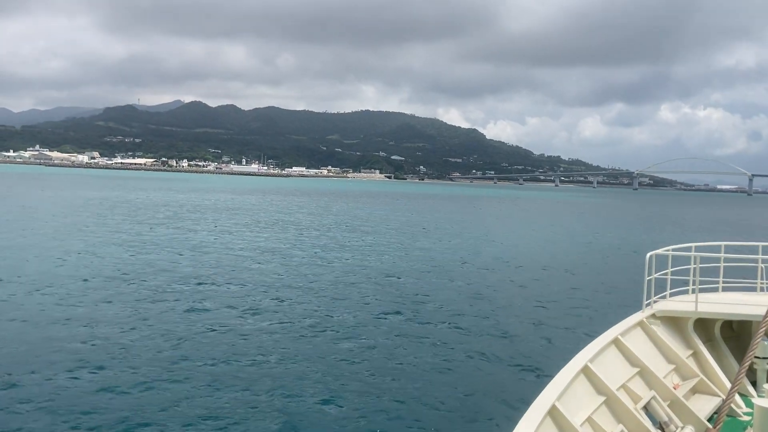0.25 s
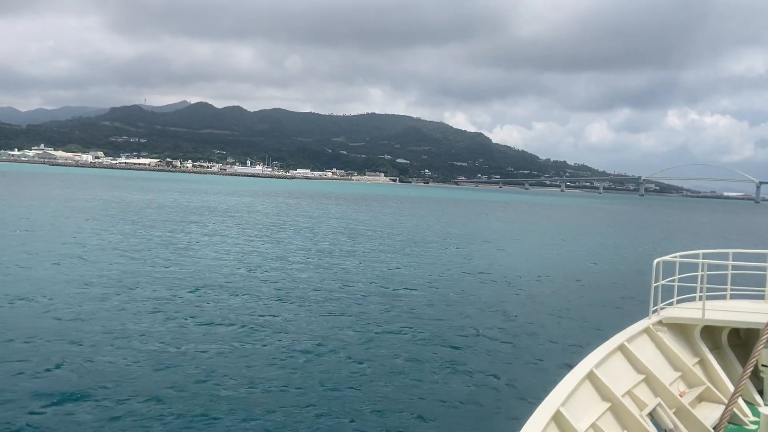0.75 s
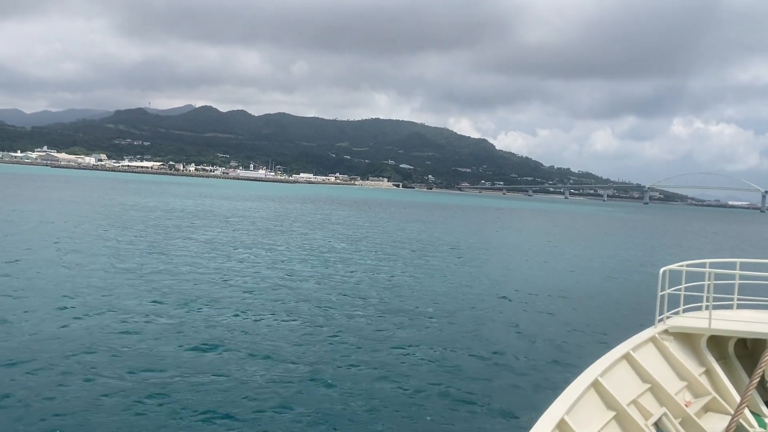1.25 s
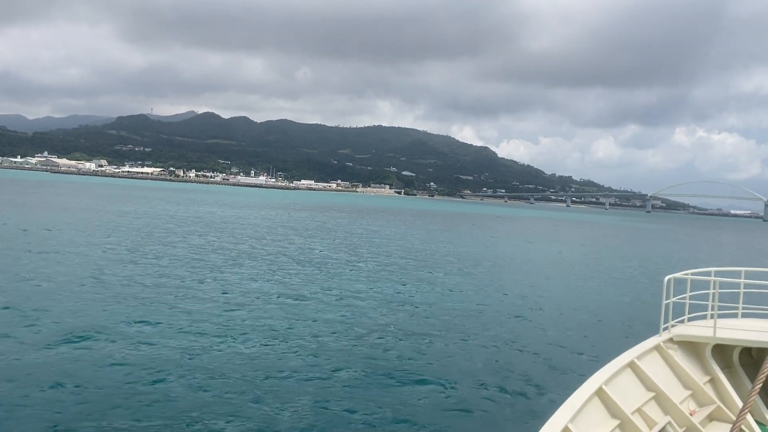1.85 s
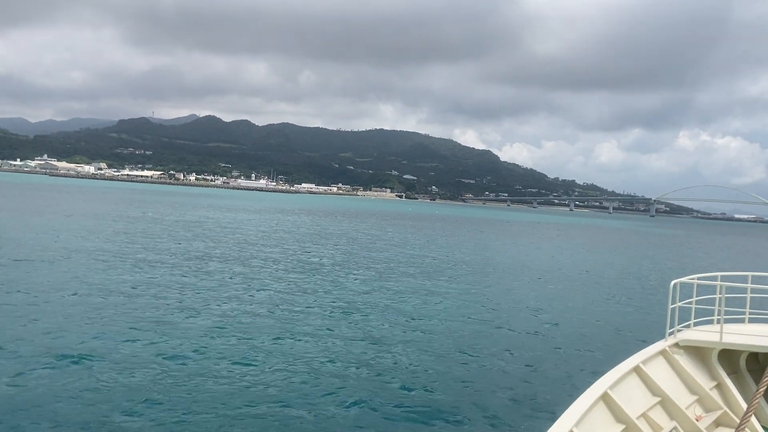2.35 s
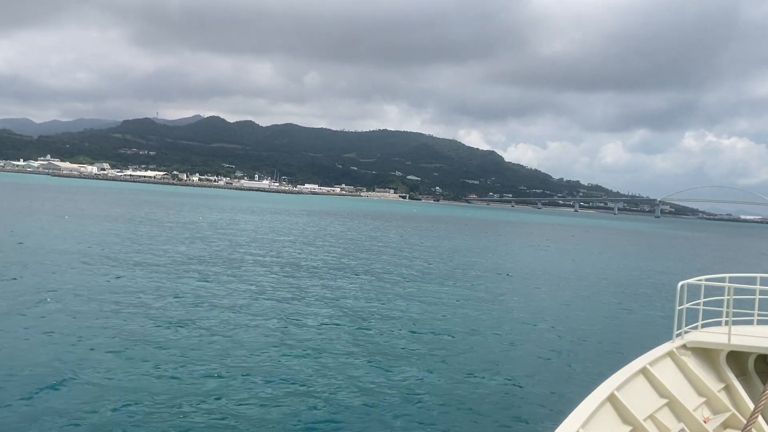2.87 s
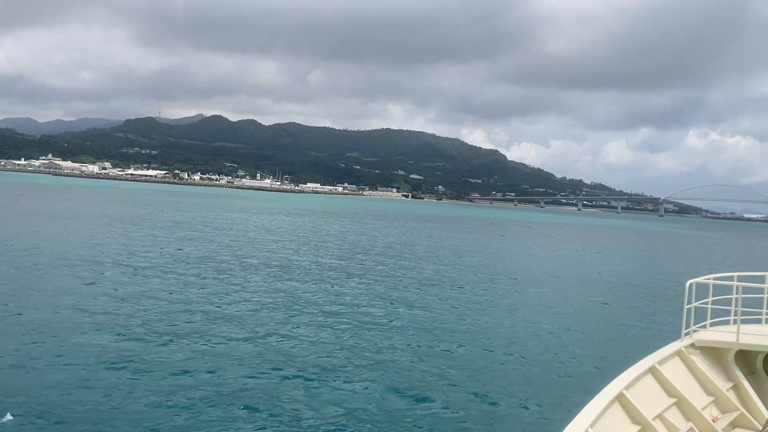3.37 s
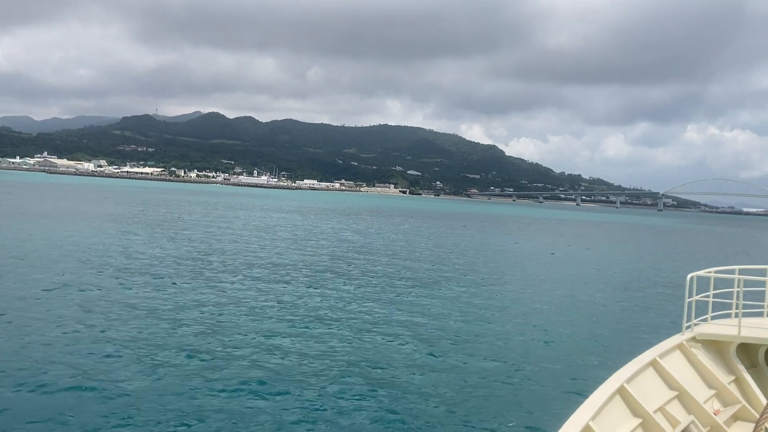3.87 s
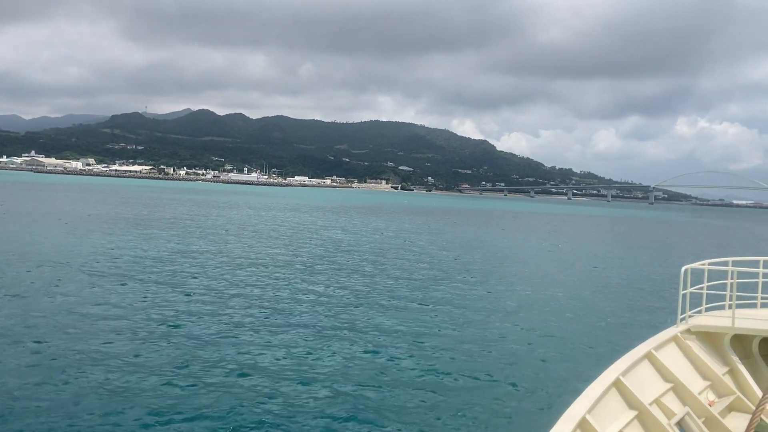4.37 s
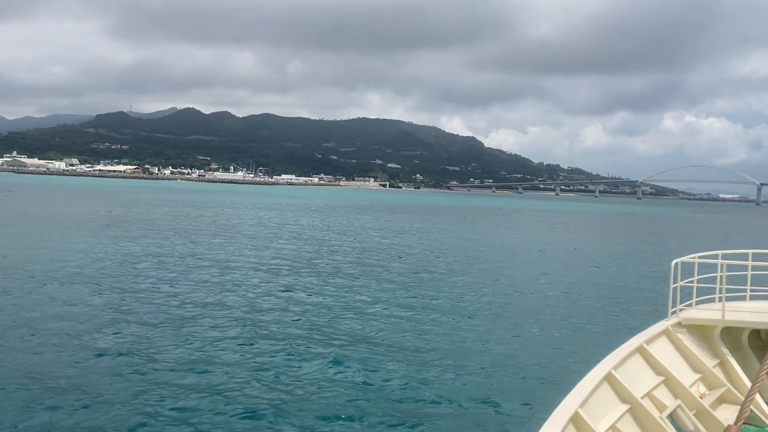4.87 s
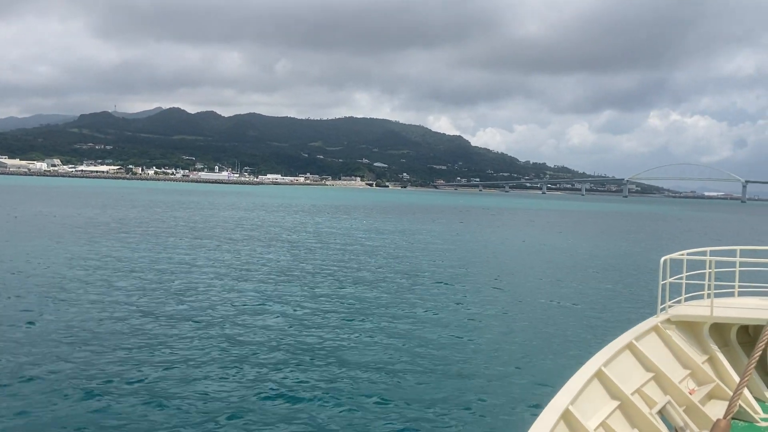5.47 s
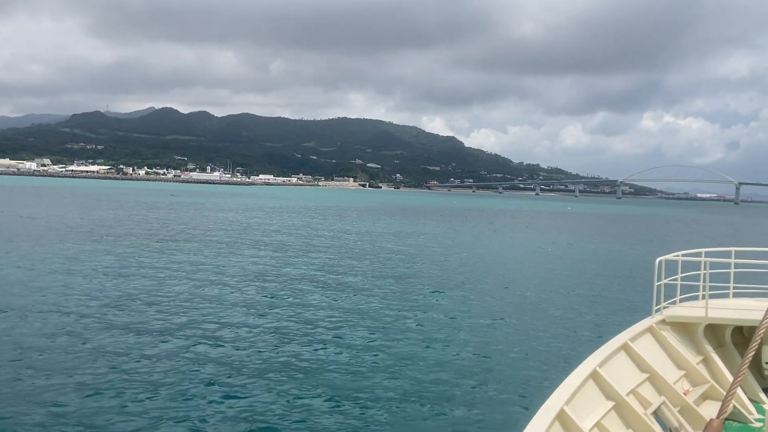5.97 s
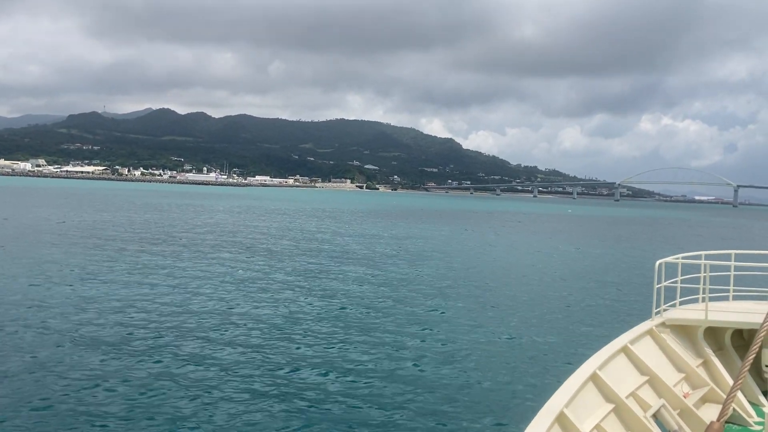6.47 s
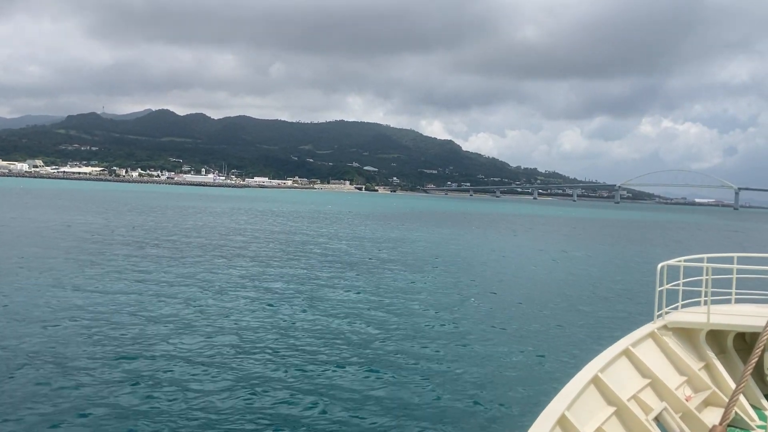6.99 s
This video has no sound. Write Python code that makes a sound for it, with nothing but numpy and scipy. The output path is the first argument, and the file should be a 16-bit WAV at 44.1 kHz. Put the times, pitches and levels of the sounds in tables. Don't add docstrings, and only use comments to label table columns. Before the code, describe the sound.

On a ship's open deck at sea, wind overwhelms an exposed stereo phone microphone: low flapping rumble, abrupt thumps and small crackling slaps, broken by short lulls. Behind it runs a soft, steady rush of bow wash and spray with a dull engine hum. Buffeting comes first, then a calmer second, then a hard gust and repeated scattered blows until the end.

```python
import sys
import numpy as np
from scipy import signal
from scipy.fft import rfft, irfft, next_fast_len
from scipy.io import wavfile
from scipy.ndimage import uniform_filter1d

SR = 44100
rng = np.random.default_rng(int(sys.argv[2]) if len(sys.argv) > 2 else 0)


def natural_amplitude(level_db):
    exponent = np.asarray(level_db, float) / 20
    return 10 ** exponent


def wrap_up_sound(samples):
    columns = np.atleast_2d(samples).T
    tamed = np.clip(columns, -1, 1)
    steps = np.round(tamed * 32767).astype(np.int16)
    wavfile.write(sys.argv[1], SR, steps)


N = 318843

TIME_S = np.arange(N) / SR
CLOCK_S = TIME_S[::32]
TICK_OF_CLOCK_S = CLOCK_S[1]
SIZE = next_fast_len(N)
OCTAVE = np.log2(np.linspace(1, SR / 2, SIZE // 2 + 1))

HULL_HZ, HULL_DB = 46.5, -36

# time in seconds, spray level in dB.
SPRAY_LEVELS = [(0.0, -50), (0.18, -53.5), (0.76, -51.5), (1.37, -57), (1.89, -50.5), (2.03, -53.5),
                (2.46, -49), (2.56, -52.5), (3.12, -55.5), (3.36, -50.5), (4.87, -51.5), (5.01, -47.5),
                (5.15, -53), (5.36, -47.5), (5.66, -48), (5.86, -53), (6.56, -45.5), (7.23, -47)]
# frequency in Hz, level in dB per band.
WASH_COLOUR = [(500, 12), (1000, -0.5), (2000, 1), (3000, 2.5), (4500, -1.5), (6000, -8.5), (8000, -7)]
# frequency in Hz, level in dB per band.
SPRAY_COLOUR = [(5000, -11), (7000, -12), (9000, -7), (11000, -1), (13000, -4), (15500, -5)]
WASH_DB, WASH_DB_PER_SPRAY_DB, USUAL_SPRAY_DB = -52.5, 0.6, -51.5

# time in seconds, peak in dB, treble in dB.
SLAPS = [(0.0054, -29.5, -12), (0.0727, -35, -18), (0.495, -38.5, -9), (1.1657, -37.5, -12),
         (2.602, -30, -19), (2.6479, -31, -17), (2.7701, -40, -14), (2.8179, -34, -8), (2.833, -25, -13.5),
         (2.8494, -28.5, -15.5), (2.8674, -28, -13), (2.93, -32, -16), (3.2311, -34, -12),
         (3.5164, -32, -20), (3.7803, -41, -13), (3.8202, -36, -16), (4.309, -29, -17), (4.9367, -35, -13),
         (4.9741, -32, -15), (5.1836, -26.5, -23), (5.2579, -41, -16), (5.2819, -27, -19),
         (5.3832, -32, -16), (5.696, -24, -21), (5.8553, -31.5, -18), (5.9319, -36, -16),
         (6.2045, -27, -14), (6.2386, -26.5, -17), (6.6813, -30, -14), (6.8234, -21.5, -18.5)]
TICKS_PER_S, TICK_DB, TICK_SPREAD_DB = 45, -53, 2.2
CRACK_S, CRACK_DB = 2.836, -38

# time in seconds, peak in dB, bass in dB, length in seconds.
PUFF_EVENTS = [(0.151, -5.5, -10, 0.022), (0.273, -5.5, -21, 0.02), (0.595, -9.5, -18, 0.013),
               (0.731, -19, -22, 0.025), (2.59, -7, -2, 0.017), (2.648, -5.5, -18, 0.021),
               (2.784, -14, -12, 0.027), (2.833, -5, -4.5, 0.025), (2.867, -1, -9, 0.023),
               (2.929, -7.5, -7, 0.014), (3.515, -13.5, -3, 0.019), (3.631, -23, -9, 0.018),
               (3.773, -10, -7, 0.017), (3.812, -10, -5.5, 0.022), (3.923, -8, -5, 0.024),
               (3.961, -4, -9.5, 0.022), (4.125, -14, -1, 0.018), (4.157, -18, -12, 0.024),
               (4.264, -26, -11, 0.024), (4.363, -6, -2.5, 0.033), (4.934, -1, -8, 0.019),
               (5.136, -4.5, -8, 0.022), (5.192, -2, -23, 0.017), (5.424, -6.5, -6, 0.024),
               (5.692, -4.5, -20, 0.013), (5.861, -9, -25, 0.016), (6.193, -11.5, 2, 0.014),
               (6.223, -14, -8, 0.029), (6.716, -10.5, -9, 0.02), (6.821, -2.5, -6, 0.016)]

EDDY_PITCH_HZ = (70, 220, 600, 1250)
# frequency in Hz, level in dB per band.
WIND_COLOUR = [(28, -38), (40, -20), (56, -5.5), (110, -3), (220, -5), (450, -6), (800, -4.5), (1250, -3),
               (1800, -14.5), (2600, -23.5), (4000, -32.5), (5200, -45)]
# time in seconds, strength in dB, brightness in dB.
BREEZE_LEVELS = [(0.0, -13.5, -14), (0.32, -32, 6.5), (0.82, -24, 1), (1.09, -31.5, 8), (1.47, -28.5, 4),
                 (1.79, -32.5, 1.5), (2.6, -34.5, 3.5), (2.78, -26.5, 8), (2.98, -22, -2), (3.4, -31, 3.5),
                 (4.45, -22, -4), (4.79, -23.5, -2), (5.3, -22.5, 4.5), (5.46, -23, -2), (6.56, -31.5, 3),
                 (7.23, -27.5, 2.5)]
# level in the usual breeze in dB, dB per dB of strength, dB per dB of brightness.
EDDIES_IN_BREEZE = [
    (-25.5, -0.34, 0),
    (-27.5, .5, -.3),
    (-30.5, 0.95, 0.1),
    (-40, 1.82, 1.01),
]
USUAL_BREEZE_DB = -29
# start in seconds, length in seconds, strength in dB, weight in dB.
BUFFET_EVENTS = [(0.0, 0.17, -30, 7.5), (0.247, .1, -24, 1.5), (0.435, .12, -23.5, -0.5),
                 (0.59, 0.2, -17, -4), (0.82, 0.028, -20.5, 0), (0.894, 0.15, -25.5, -4),
                 (1.374, 0.057, -22.5, -1), (2.586, 0.1, -19, -1), (2.691, 0.073, -16.5, -6),
                 (2.775, 0.029, -19, 4.5), (2.827, 0.074, -13, -1), (2.9, 0.037, -13, -9),
                 (2.977, 0.21, -18.5, -12), (3.211, 0.12, -19, -4), (3.602, 0.097, -19, -5),
                 (3.764, 0.051, -23, -3.5), (3.876, 0.13, -20, -9), (4.03, 0.091, -21, 0),
                 (4.111, 0.069, -20, 2), (4.23, 0.34, -17, -8), (4.58, .14, -23.5, -4),
                 (4.926, 0.13, -18, -3.5), (5.133, 0.24, -19, 0), (5.425, 0.064, -19, -9),
                 (5.666, 0.051, -15.5, -17), (5.827, 0.058, -19, -7), (6.185, 0.066, -11.5, -6),
                 (6.629, 0.19, -20, 1.5), (6.794, 0.058, -17.5, 2.5), (7.057, .07, -23.5, 4)]
# level under a buffet in dB, dB per dB of weight.
EDDIES_IN_BUFFET = [
    (-14.5, -0.7),
    (-2.5, 1.92),
    (-2, 0),
    (-12.5, 0.18),
]
ARCH_DB = (0.1, 0.5, 1.5, 4)
BUFFET_RISE_S, BUFFET_FALL_S, BUFFET_SAG_DB_PER_S = 0.0057, 0.023, -7.5
# start in seconds, length in seconds, strength in dB.
HEAVE_EVENTS = [(0.037, 0.093, -22), (0.28, 0.022, -30), (0.656, 0.026, -17), (1.856, 0.04, -14),
                (2.221, 0.029, -30), (2.6, 0.07, -20), (2.66, 0.044, -33), (2.732, 0.03, -22),
                (2.814, 0.038, -7), (2.993, 0.054, -19), (3.18, 0.067, -16), (4.313, 0.053, -17),
                (4.947, 0.05, -17), (5.21, 0.11, -25), (5.675, 0.043, -16), (6.173, 0.052, -13),
                (6.243, 0.029, -17), (6.674, 0.21, -17), (7.092, 0.03, -19)]
HEAVE_SHARE_DB = (-4, -12.5, -25, -40)
HEAVE_RISE_S, HEAVE_FALL_S = 0.022, 0.036
# middle in seconds, length in seconds, depth in dB.
LULL_EVENTS = [(0.218, 0.045, -0.5), (0.415, .06, -1.5), (0.587, 0.087, -7), (0.779, 0.046, -10),
               (.875, .03, -8), (1.775, .08, -6.5), (2.582, 0.017, 3), (2.768, 0.034, -5),
               (2.971, 0.032, -7), (3.19, .04, 1), (3.383, 0.035, -6), (3.74, .03, -2.5),
               (4.093, 0.018, -7), (4.184, 0.078, -7), (4.912, 0.025, -8), (5.112, 0.048, -5),
               (5.415, .02, -4), (5.584, 0.12, -8), (5.772, 0.068, -7.5), (6.154, 0.14, -2.5),
               (6.217, 0.011, -17), (6.592, .04, -7), (6.923, 0.11, -3.5)]
LULL_SHARE = (.2, .7, 1.01, 1.1)

# frequency in Hz, likeness from 0 to 1.
PORT_LIKENESS = [(100, 0.74), (900, 0.83), (1300, 0.15), (1600, 0.71), (2100, 0.08), (3000, 0.25),
                 (3700, 0), (4400, 0.45), (5100, 0), (5700, 0.26), (6300, 0.06), (6900, 1), (16000, 1)]
# frequency in Hz, left minus right in dB.
PORT_TILT = [(600, -.6), (1200, 5), (2000, 1.2), (4200, .8), (5400, -3.6), (7000, 0)]
# frequency in Hz, phase in turns.
BODY_TURNS = [(1900, 0), (2600, -.5), (3500, -.55), (4000, -.87), (5000, -1), (5500, -1.45), (6100, -1.4),
              (6500, -1.05), (6992, -1)]
EDDY_LAG_S, EDDY_IN_PHASE_HZ, EDDY_TOP_HZ = 1 / 430, 520, 1400
SPRAY_LEAD_S, SPRAY_IN_PHASE_HZ = 2.296e-4, 6992

# time in seconds, edge in Hz.
MONO_EDGE = [(0.0, 402), (2.4, 454), (3.6, 430), (4.4, 255), (5.0, 177), (6.1, 159), (6.8, 305),
             (7.23, 350)]
TOP_HZ = 15700


def over_hz(hz, table):
    table_hz, value = np.transpose(table)
    return np.interp(np.log(hz), np.log(table_hz), value)


def over_time(table):
    s, *columns = np.transpose(table)
    return np.array([np.interp(CLOCK_S, s, column) for column in columns])


def noise():
    return rfft(rng.standard_normal((2, SIZE)))


def walk(rate_hz):
    k = max(int(1 / rate_hz / TICK_OF_CLOCK_S), 1)
    draws = rng.standard_normal(len(CLOCK_S) // k + 1)
    held = np.repeat(draws, k)[:len(CLOCK_S)]
    slewed = uniform_filter1d(uniform_filter1d(held, k), k)
    return 1.8 * np.tanh(.9 * slewed)


def band(white, hz, octaves, gain):
    offset = np.clip((OCTAVE - np.log2(hz)) / octaves, -1, 1)
    x = irfft(white * np.cos(np.pi / 2 * offset) ** 2, SIZE)[:, :N]
    return x * np.interp(TIME_S, CLOCK_S, gain / x[:, ::7].std())


def spell(start_s, length_s, rise_s, fall_s):
    up = (CLOCK_S - start_s) / max(rise_s, .002)
    down = (start_s + length_s - CLOCK_S) / max(fall_s, .002)
    return np.sin(np.pi / 2 * np.clip(np.minimum(up + .5, down + .5), 0, 1)) ** 2


def hull():
    return band(noise(), HULL_HZ, 0.9, natural_amplitude(HULL_DB + 0.97 * walk(2.7)))


def sea():
    spray_db = over_time(SPRAY_LEVELS)[0] + 1.17
    wash_db = WASH_DB + WASH_DB_PER_SPRAY_DB * (spray_db - USUAL_SPRAY_DB)
    white, out, surge, fizz = noise(), 0, walk(22), walk(50)
    for hz in 500 * 2 ** np.arange(0, 5.1, .5):
        wash = natural_amplitude(wash_db + over_hz(hz, WASH_COLOUR) - 2.5) * (hz < 9000)
        spray = natural_amplitude(spray_db + over_hz(hz, SPRAY_COLOUR) + 2.0) * (hz > 4500)
        shimmer = natural_amplitude(.25 * surge + .7 * fizz + .5 * walk(45))
        out = out + band(white, hz, 0.51, shimmer * np.hypot(wash, spray))
    return out


def snaps(gust_db):
    low, high = np.zeros((2, len(CLOCK_S)))
    for s, db, treble_db in SLAPS:
        shape = np.exp(-((CLOCK_S - s - .002) / .0035) ** 2)
        low += natural_amplitude(db) * shape
        high += natural_amplitude(db + treble_db + 4) * shape
    when, size = rng.random((2, len(CLOCK_S)))
    tick_db = TICK_DB - TICK_SPREAD_DB * np.log(size + 1e-3) + .6 * (gust_db + 35)
    ticks = (when < TICKS_PER_S * TICK_OF_CLOCK_S) * natural_amplitude(tick_db)
    ticks = 3 * uniform_filter1d(ticks, size=3)
    crack = natural_amplitude(CRACK_DB) * np.exp(-((CLOCK_S - CRACK_S) / 0.0022) ** 2)
    white = noise()
    slaps = band(white, 1800, 1.0, low) + band(white, 3650, 0.84, high)
    return slaps + band(white, 3300, 1.55, ticks) + band(white, 6800, 1.3, crack)


def puffs():
    body, bass = np.zeros((2, len(CLOCK_S)))
    lull = np.ones(len(CLOCK_S))
    for s, db, bass_db, length_s in PUFF_EVENTS:
        age = np.maximum(CLOCK_S - s, 0) / max(length_s, .004)
        shape = (1 - np.exp(-age / 0.046)) * np.exp(-age ** 4.8)
        body += natural_amplitude(db - 12.5) * shape
        bass += natural_amplitude(db + bass_db - 6) * shape
        lull *= 1 - 0.63 * (CLOCK_S < s) * np.exp(-np.abs(CLOCK_S - s) / 0.011)
    grit, white = natural_amplitude(2.0 * walk(180)), noise()
    bursts = band(white, 507, 1.53, grit * lull * body) + band(white, 200, 1.24, bass)
    bursts = bursts + band(white, 1340, 1.2, natural_amplitude(-5.0) * grit * body ** 1.72)
    return bursts, lull


def turbulence():
    strength_db, bright_db = over_time(BREEZE_LEVELS)
    level_db, slope, lean = np.transpose(EDDIES_IN_BREEZE)[:, :, None]
    power = natural_amplitude(level_db + slope * (strength_db - USUAL_BREEZE_DB) + lean * bright_db) ** 2
    under_db, share = np.transpose(EDDIES_IN_BUFFET)[:, :, None]
    arch_db = np.array(ARCH_DB)[:, None]
    for s, length_s, db, weight_db in BUFFET_EVENTS:
        tiring_db = db + BUFFET_SAG_DB_PER_S * np.clip(CLOCK_S - s, 0, length_s)
        crest = np.sin(np.pi * np.clip((CLOCK_S - s) / length_s, 0, 1)) - 2 / np.pi
        buffet = natural_amplitude(tiring_db + arch_db * crest + under_db + share * weight_db)
        power = power + (buffet * spell(s, length_s, BUFFET_RISE_S, BUFFET_FALL_S)) ** 2
    lull_db = sum(db * np.exp(-(2 * (CLOCK_S - s) / length_s) ** 2) for s, length_s, db in LULL_EVENTS)
    power = power * natural_amplitude(np.array(LULL_SHARE)[:, None] * lull_db) ** 2
    for s, length_s, db in HEAVE_EVENTS:
        heave = natural_amplitude(db + np.array(HEAVE_SHARE_DB)[:, None])
        power = power + (heave * spell(s, length_s, HEAVE_RISE_S, HEAVE_FALL_S)) ** 2
    return 10 * np.log10(power)


def wind(gust_db, lull):
    white, out = noise(), 0
    flutter, rasp, deep = walk(60), walk(150), walk(25)
    for hz in 28 * 2 ** np.arange(0, 7.6, .5):
        place = np.interp(np.log(hz), np.log(EDDY_PITCH_HZ), np.arange(4))
        k = min(int(place), 2)
        db = gust_db[k] + (place - k) * (gust_db[k + 1] - gust_db[k])
        db = db + over_hz(hz, WIND_COLOUR)
        db = db + 0.45 * max(np.log2(hz / 1500), 0) * (gust_db[3] + 26)
        small = np.clip(np.log2(hz / 90) / 1.17, 0, 1)
        db = db + small * (1.57 * flutter + 2.62 * rasp) + (1 - small) * 0.72 * deep
        db = db + 1.56 * walk(50)
        out = out + band(white, hz, 0.49, natural_amplitude(db) * lull ** small)
    return out


def at_ports(pair):
    left, other = rfft(pair, SIZE)
    hz = 2 ** OCTAVE
    eddy_turns = -(np.minimum(hz, EDDY_TOP_HZ) - EDDY_IN_PHASE_HZ) * EDDY_LAG_S
    spray_turns = (hz - SPRAY_IN_PHASE_HZ) * SPRAY_LEAD_S
    low_turns = eddy_turns + over_hz(hz, BODY_TURNS)
    turns = np.where(hz < SPRAY_IN_PHASE_HZ, low_turns, spray_turns)
    like = np.clip(over_hz(hz, PORT_LIKENESS), 0, 1)
    right = like * np.exp(2j * np.pi * turns) * left + np.sqrt(1 - like ** 2) * other
    tilt = natural_amplitude(over_hz(hz, PORT_TILT) / 2)
    return irfft(np.array([left * tilt, right / tilt]), SIZE)[:, :N]


def scene():
    gust_db = turbulence()
    bursts, lull = puffs()
    return at_ports(hull() + sea() + snaps(gust_db[3]) + bursts + wind(gust_db, lull))


def fold_bass(dry):
    hz, s, (left, right) = signal.stft(dry, SR, nperseg=2048)
    edge_hz = 1.255 * np.interp(s, *np.transpose(MONO_EDGE))
    wide = 1 / (1 + (edge_hz / (hz[:, None] + 1)) ** 10.2)
    folded = np.array([left, left + wide * (right - left)])
    return signal.istft(folded, SR, nperseg=2048)[1][:, :N]


def top_cut(x):
    return signal.sosfilt(signal.butter(12, 17050, fs=SR, output="sos"), x)


def record(dry):
    x = fold_bass(dry)
    x = signal.sosfilt(signal.butter(2, 35, "highpass", fs=SR, output="sos"), x)
    x = x / (1 + (x / .95) ** 4) ** .25
    x = signal.sosfilt(signal.ellip(12, .2, 70, TOP_HZ, fs=SR, output="sos"), x)
    return top_cut(x)


dry = scene()
out = record(dry)
wrap_up_sound(out)
```